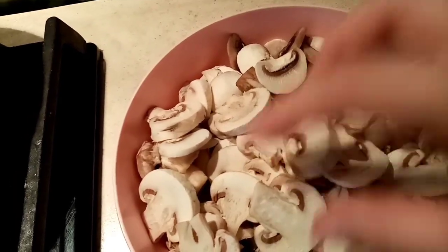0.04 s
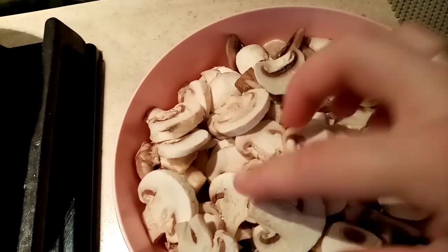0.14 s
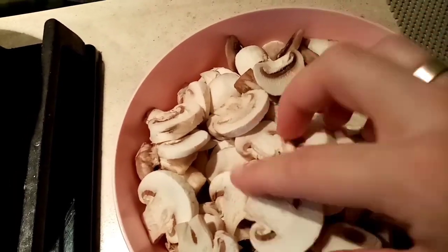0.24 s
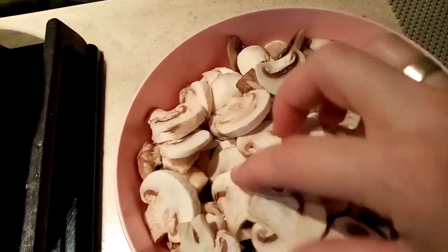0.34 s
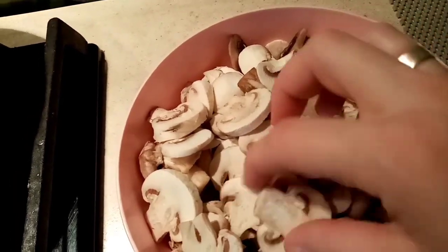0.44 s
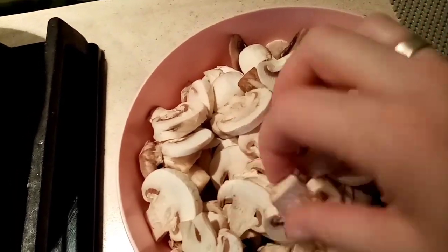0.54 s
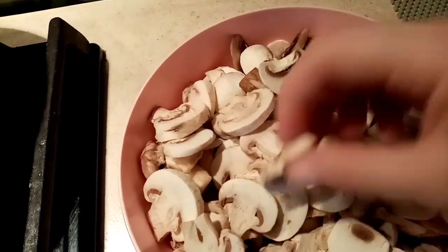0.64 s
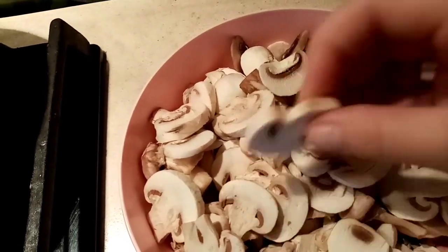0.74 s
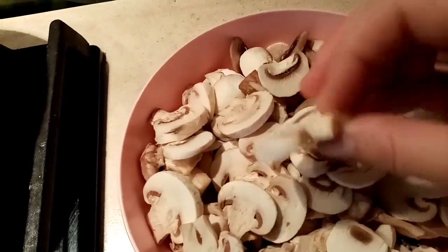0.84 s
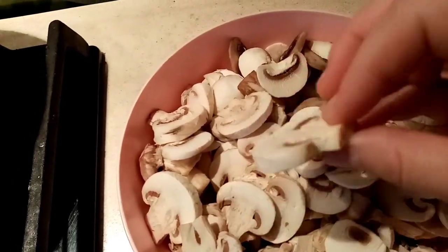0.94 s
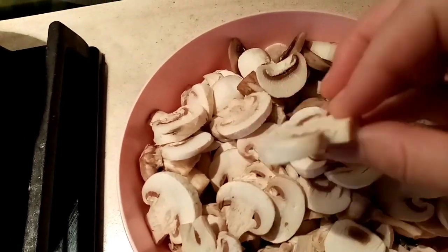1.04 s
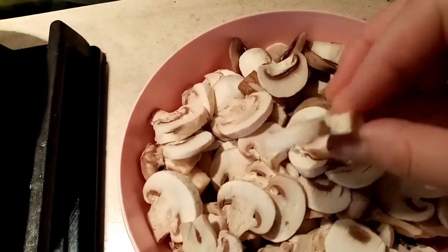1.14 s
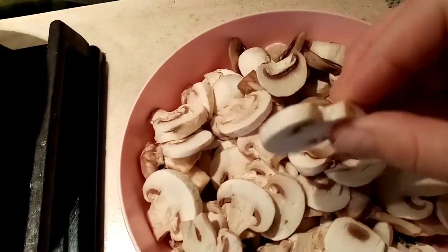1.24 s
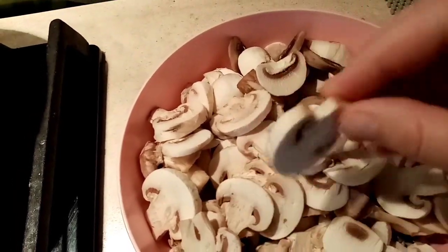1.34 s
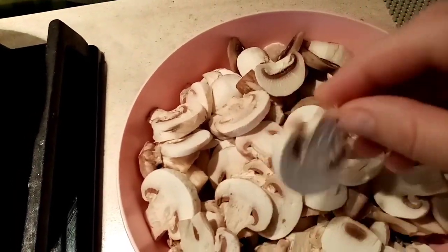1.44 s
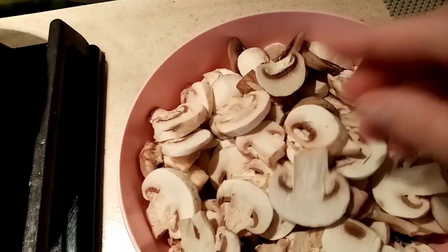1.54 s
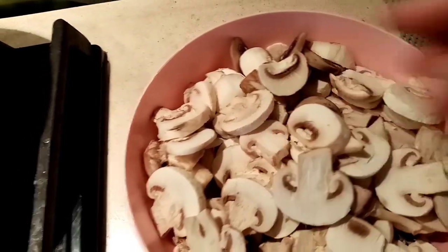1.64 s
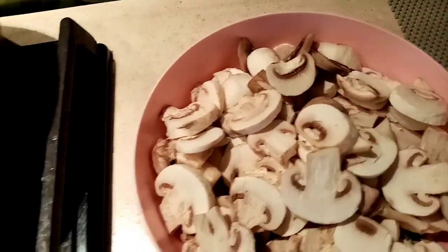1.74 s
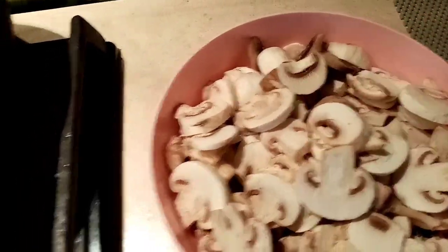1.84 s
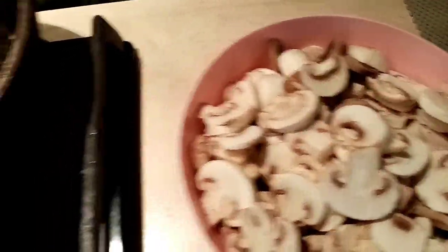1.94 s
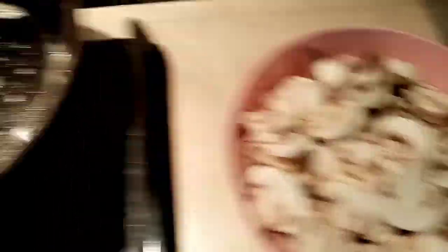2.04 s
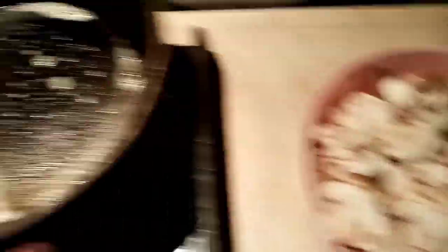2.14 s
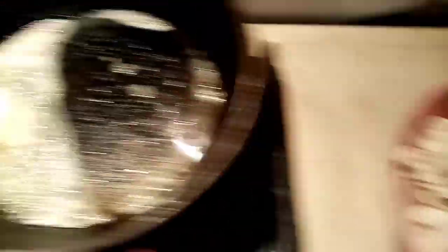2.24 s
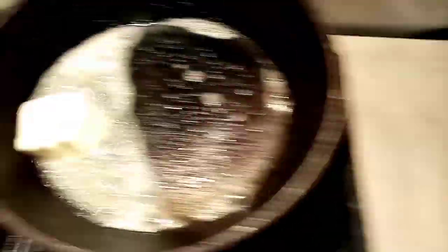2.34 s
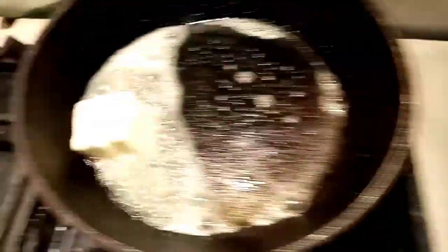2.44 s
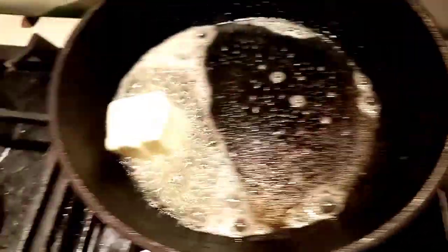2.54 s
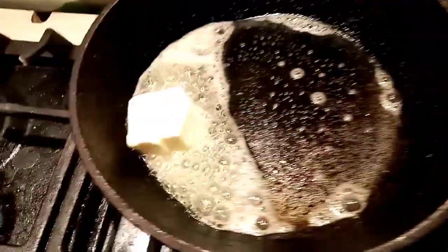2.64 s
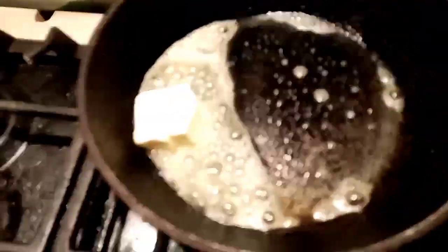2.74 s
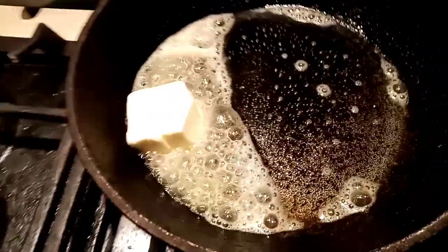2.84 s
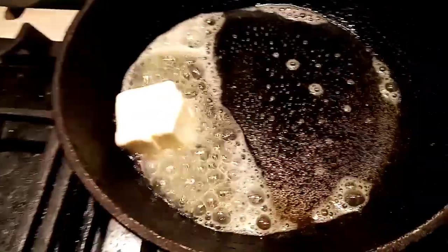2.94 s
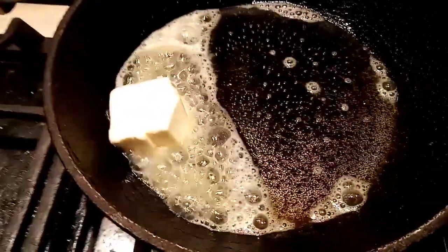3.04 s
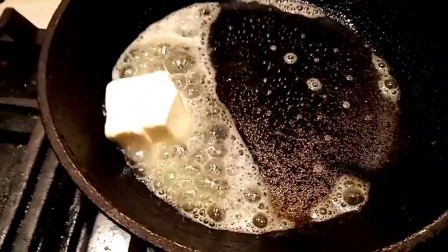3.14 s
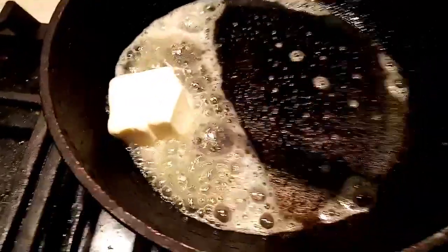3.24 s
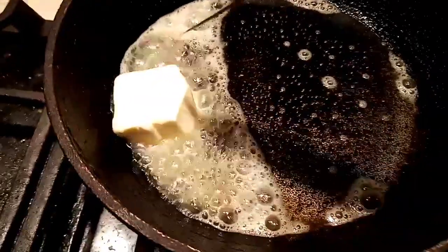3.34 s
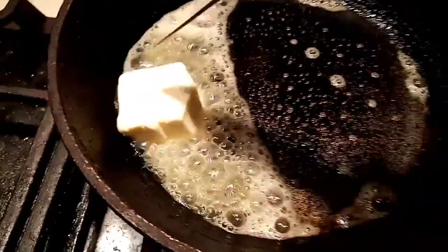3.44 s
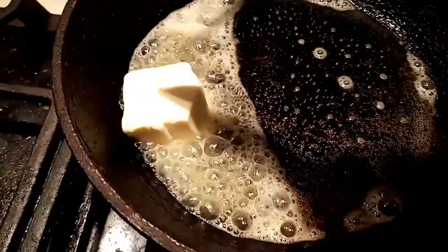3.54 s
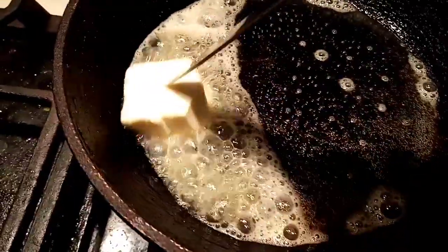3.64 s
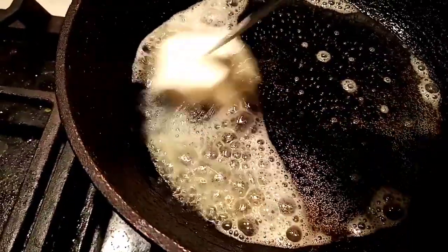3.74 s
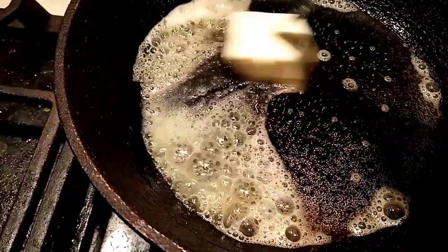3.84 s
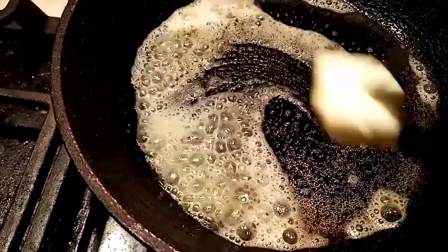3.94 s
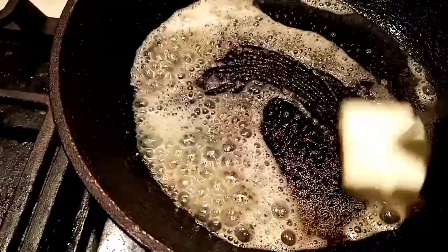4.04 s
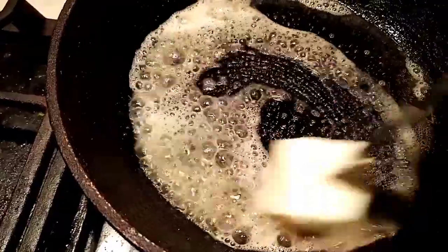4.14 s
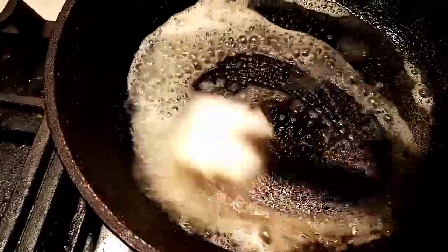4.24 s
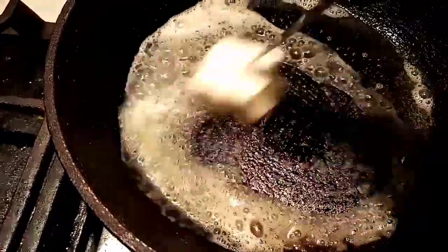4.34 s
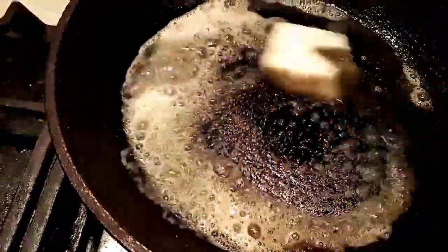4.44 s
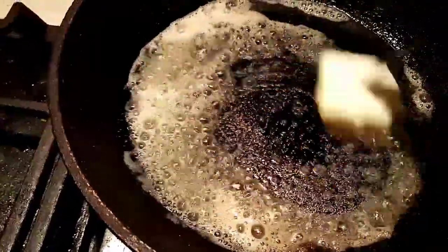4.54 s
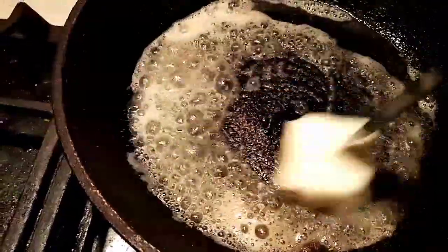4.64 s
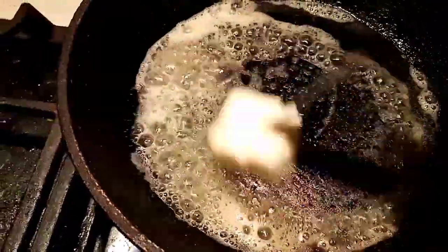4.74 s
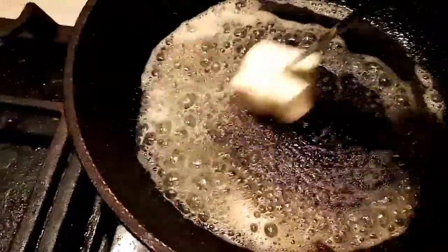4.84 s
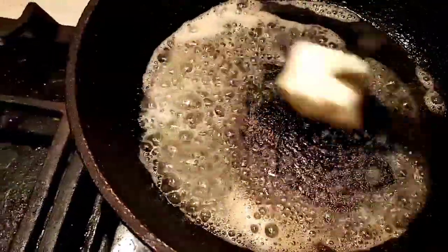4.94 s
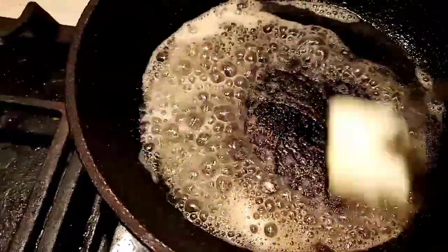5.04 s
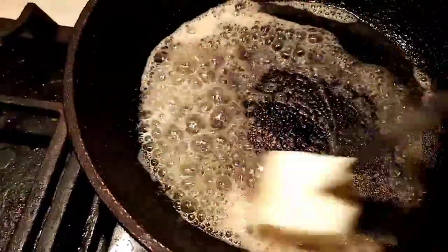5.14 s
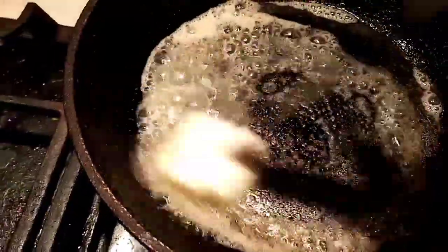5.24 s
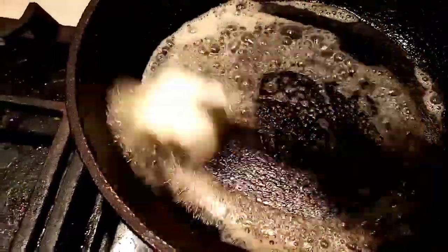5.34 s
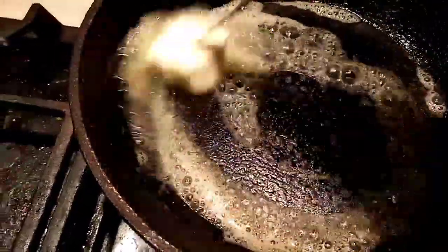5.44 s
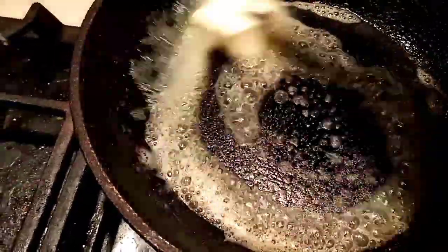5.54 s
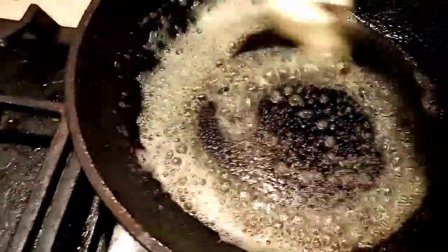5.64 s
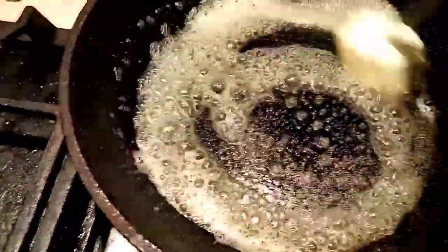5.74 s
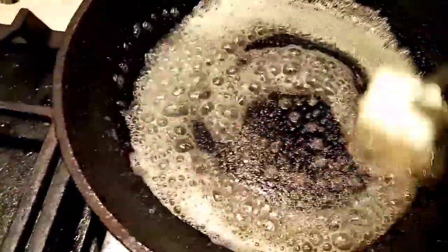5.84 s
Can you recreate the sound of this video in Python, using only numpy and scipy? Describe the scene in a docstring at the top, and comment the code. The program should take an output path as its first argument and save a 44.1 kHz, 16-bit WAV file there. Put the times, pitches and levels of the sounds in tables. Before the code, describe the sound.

Close frying sizzle of melting butter in a home kitchen, growing brighter and spitting more as a utensil pushes it about.

```python
"""Butter frying in a pan

Butter fries in a hot pan on a kitchen hob, heard from a phone that swings over from a bowl of mushrooms.
Thousands of short pings, one for each steam bubble, echo off the pan wall; spreading the butter from about 3.7
s makes the sizzle louder and finer. Larger bubbles spit, sputter and plop above the foam. Filtered pulses and
noise give knocks of the pan and low shoves; damped modes give the utensil's clinks. Early on, a hand taps in
the bowl and mushroom slices tick and thump; later the phone rustles in the hand; the room rumbles."""
import sys
import numpy as np
from scipy import signal
from scipy.fft import rfft, irfft
from scipy.io import wavfile
from scipy.ndimage import uniform_filter1d

SR = 44100
rng = np.random.default_rng(int(sys.argv[2]) if len(sys.argv) > 2 else 0)


def transcribe(signal):
    """Save signal, clipped to [-1, 1], as a 16-bit WAV file at the path in sys.argv[1]."""
    frames = np.atleast_2d(signal).T
    limited = np.clip(frames, -1, 1)
    pcm = np.round(limited * 32767).astype(np.int16)
    wavfile.write(sys.argv[1], SR, pcm)


N = 260190
T = np.arange(N) / SR  # time in s

# Spectrum of the kitchen rumble. Each row: frequency in Hz, relative density in dB per Hz.
KITCHEN = [(20, -16), (45, -20), (70, -15), (95, -3.5), (115, -6.5), (134, 3), (165, -8.5), (210, -12.5),
           (300, -13), (450, -18), (700, -15.5), (1500, -65.5)]
# Touches in the bowl of mushrooms: first a hand taps, then slices brush and land on the heap. Each row: # start
# in seconds, thump level in dB, tick level in dB before its envelope, tick centre in Hz, # tick decay time in
# seconds.
SLICES = [(0.4174, -48.5, -45, 800, 0.003), (1.462, -79, -38.5, 3900, 0.015),
          (1.474, -67, -46, 1420, 0.012)]
# Fingers shift on the phone. Each row: time of the top in seconds, relative level in dB, half width in seconds.
RUBS = [(2.467, -59.5, 0.03), (2.579, -56, 0.033), (2.675, -66.5, 0.025)]
# Resonances of the phone's case. Each row: frequency in Hz, width in Hz, relative level in dB.
CASE = [(142, 33, 6.5), (248, 43, 5), (406, 57, 1), (616, 49, 1), (794, 160, -17), (1090, 43, 1.5)]
# Modes of the hob under the pan. Each row: frequency in Hz, width in Hz, relative level in dB.
HOB = [(90, 20, -8.5), (134.5, 16, 6.5), (199, 160, -8), (242, 12.6, -1.5), (317, 12.4, 1.5),
       (347, 20, -6.5)]
# Slow, low rumbling shoves: in the first two rows the hand moves the bowl of mushrooms, later the butter is
# pushed around. Each row: time of the top in seconds, relative level in dB, centre of the push in Hz,
# half width in seconds.
SHOVES = [(1.43, -73, 115, 0.056), (1.65, -69, 115, 0.058), (3.63, -66, 68, 0.059),
          (4.1, -63.5, 170, 0.053), (5.42, -65.5, 171, 0.071), (5.6, -61, 248, 0.074), (5.7, -57, 90, 0.04),
          (5.79, -60, 190, 0.075)]
# The pan knocks and rocks on the hob. Each row: start in seconds, relative level in dB, contact time in seconds.
KNOCKS = [(5.073, -54, 0.0023), (5.084, -43.5, 0.004), (5.099, -44.5, 0.0046), (5.105, -46, 0.0053),
          (5.157, -53, 0.005), (5.289, -50.5, 0.0036), (5.304, -53, 0.0047), (5.344, -54, 0.003),
          (5.655, -55, 0.0025), (5.683, -55, 0.0091), (5.779, -56, 0.004)]
# The utensil touches the pan. Each row: start in seconds, peak of the direct sound in dB.
TAPS = [(4.191, -39), (5.374, -34), (5.39, -34), (5.3932, -28), (5.397, -25)]
# Modes of the pan. Each row: frequency in Hz, relative level in dB, time to decay by 60 dB in seconds.
PAN_MODES = [(1050, -5, 0.04), (1230, 1, 0.025), (1530, 2, 0.074), (1775, 11, 0.026), (1970, -3.5, 0.1),
             (2360, -2, 0.014), (2470, 3, 0.026)]
# Fat bubbles open in the deep butter. Each row: start in seconds, relative level in dB, pitch in Hz.
PLOPS = [(3.159, -46, 1060), (3.218, -53, 1370), (3.437, -47, 1510), (3.707, -45, 1500), (4.126, -51, 1010),
         (4.209, -45, 1450), (4.257, -41, 1320), (4.577, -44, 1360), (4.733, -44, 1360), (4.879, -44, 1110),
         (5.042, -51, 1080), (5.069, -51, 1020), (5.198, -43, 1260), (5.522, -53, 1040)]
# Clumps of foam collapse. Each row: start in seconds, relative level at the first bubble in dB,
# middle pitch in Hz, length in seconds, left minus right in dB.
SPUTTERS = [(1.631, -37, 4400, 0.045, -4), (1.915, -30.5, 6130, 0.016, -4), (2.09, -29.5, 5200, 0.011, 0),
            (2.151, -33.5, 4300, 0.015, 0), (2.357, -32.5, 5860, 0.008, -6),
            (2.381, -32.5, 5800, 0.016, -9), (2.702, -28.5, 7300, 0.045, -6), (4.202, -27, 7450, 0.06, -12),
            (4.629, -21.5, 6900, 0.042, -2), (4.732, -27.5, 4960, 0.046, 3),
            (4.811, -21.5, 6200, 0.013, -2), (4.88, -23.5, 7850, 0.0086, -12)]
# Loud spits of fat. Each row: start in seconds, relative level in dB, pitch in Hz, left minus right in dB,
# cycles to reach the peak.
SPITS = [(0.307, -29, 4230, -2, 0.89), (0.906, -32, 7260, 3, 2.8), (1.139, -25, 6560, -3, 0.79),
         (1.306, -29, 7750, -10, 1.8), (1.623, -22, 4300, -1.5, 2.4), (1.74, -33, 4900, 1, 1.9),
         (1.9097, -22.5, 6300, -2, 1.3), (2.0906, -22.5, 5800, -2, 0.87), (2.1485, -30.5, 4170, 0, 1.5),
         (2.356, -24, 5600, 0, 2.2), (2.5067, -22, 7030, 2, 2), (2.551, -26, 6500, -9, 1.3),
         (2.6367, -13.5, 5200, -4.5, 0.91), (2.648, -29, 6660, -4, 2.2), (2.681, -20.5, 5460, 0, 0.8),
         (2.7036, -23, 7060, -12, 2.2), (2.7277, -23, 7000, -6, 1.1), (2.736, -25, 6670, -7, 2.2),
         (2.7557, -24, 7000, -4, 2.6), (2.9382, -26, 7040, -9, 1.6), (3.057, -17, 5640, -1, 0.95),
         (3.0956, -19, 6760, -6, 0.84), (3.183, -24, 8200, -3, 2), (3.1914, -22, 6200, -1, 1.1),
         (3.217, -23, 6600, -2, 1), (3.234, -25, 6200, -4, 1.4), (3.239, -24, 6340, -9, 1.6),
         (3.437, -32, 6900, -2, 1.7), (3.494, -20.5, 5100, -2, 1.1), (3.5146, -22, 6700, -2, 2.5),
         (3.55, -24, 5170, 0, 0.95), (3.636, -30, 15000, -6, 4), (3.7726, -18.5, 5700, -1, 0.8),
         (3.7975, -23, 3800, -2, 1.7), (3.877, -23, 5570, 0, 1.4), (3.918, -24.5, 6650, -1, 2.4),
         (3.9398, -24, 5860, 5, 2.1), (3.983, -20.5, 5900, -3, 1.8), (3.9986, -18.5, 7400, -3, 1.8),
         (4.1267, -18.5, 6360, -1, 2.4), (4.168, -22, 6500, -2, 2), (4.19, -23, 4120, -5, 2.8),
         (4.216, -14, 6500, -2, 1.04), (4.268, -14.5, 6900, -2, 0.96), (4.2857, -18.5, 6040, -1, 1.9),
         (4.342, -24, 4600, -2, 0.68), (4.556, -20, 6700, -1, 1.7), (4.652, -15, 6700, -4, 0.62),
         (4.685, -27, 5800, -1, 1.5), (4.731, -19.5, 5400, 0, 2.4), (4.7494, -20, 6650, -5, 1.4),
         (4.81, -20, 6100, -1, 1.4), (4.888, -17, 9000, -5, 2), (4.9364, -17, 6710, 1, 1.1),
         (4.948, -19, 7050, -5, 1.8), (4.987, -21, 6540, -2, 2.4), (5.232, -21, 6700, -8, 1.8),
         (5.239, -18, 6730, -2.5, 1.9), (5.272, -21, 7200, -12, 1.4), (5.288, -22, 6400, -11, 1.8),
         (5.479, -22, 7000, -9, 1.5), (5.519, -24, 7100, -13, 2.6), (5.622, -18, 15000, -6, 4),
         (5.635, -22, 15000, -6, 3.7), (5.715, -27, 15000, -2, 4.6), (5.8, -22.5, 7240, -10, 1.2)]
# Colour of the droplets' snaps. Each row: frequency in Hz, gain in dB.
SNAP = [(3000, -13), (8000, 10), (11000, -12.5), (13500, -13), (14800, 3)]
# Colour of the sizzle. Each row: frequency in Hz, relative density in dB per Hz.
SIZZLE = [(500, -41), (800, -25), (1250, -14.5), (1800, -11), (2150, -13), (3300, -1.9), (5000, 0.5),
          (6600, 3), (7700, 0.5), (8900, 0), (10500, -10), (13500, -16.5), (14700, -5), (15400, -5.5)]
# Hollow resonances of the pan that colour the bubbling. Each row: frequency in Hz, width in Hz, level in dB.
HOLLOW = [(748, 42, 6.5), (1031, 26, -1), (1525, 13, -7.5), (1806, 81, 1.5), (1980, 38, 1.5),
          (2478, 37, -6.5), (6510, 930, -10)]
# How four voices of the frying grow. Each holds: relative level at the start in dB, rise in dB per second as
# more butter melts, rise in dB from above the pan, rise in dB once the butter is spread.
COARSE = (-58.5, 0.5, 0.45, 0.5)
CRACKLE = (-47, 0.7, 3.5, 1.2)
FIZZ = (-56, 1, 1, 10)
GURGLE = (-62, 0.5, 1, 5.5)
# The phone moves over the pan; later, stirring spreads the butter. Each holds: start and length in seconds.
APPROACH = (2.434, 0.15)
SPREAD = (3.71, 0.56)
# Sweeps of the butter over hot metal swell the sizzle. Each row: time of the top in seconds, rise in dB.
SWEEPS = [(4.24, 4.5), (4.66, 3.5), (4.93, 4), (5.23, 4.5), (5.66, 3)]
# Bearing of the pan as the phone turns. Each row: time in seconds, left minus right in dB.
BEARING = [(0.0, 0), (2.48, -0.5), (2.7, -2.5), (3.43, -1.5), (4.96, -3.5), (5.14, -1.5), (5.47, -4.5),
           (5.9, -1)]
# Response of the left microphone port, shaded in the top treble. Each row: frequency in Hz, gain in dB.
LEFT_PORT = [(500, -2.0), (1000, -3.4), (1700, -2.1), (2400, 0.9), (4000, 0.6), (5500, 1.2), (7000, -0.6),
             (8500, -1.6), (9700, -0.7), (10400, -2.7), (11200, -9.9), (13000, -13.6), (14000, -19.0),
             (15400, -23.8)]

TOP_HZ = 15700  # upper limit of the microphones
SWING_S = 2.3  # the arrival lags of the foam change here
ASIDE_LAG_S, PORT_LAG_S = .00135, .0012  # lag of the right port, from the counter and from above


def undb(db):
    """Logarithmic levels: convert decibels to an amplitude gain."""
    return 10 ** (np.asarray(db) / 20)


def unit(x):
    """Normalisation: scale to rms 1."""
    return x / np.sqrt(np.mean(x ** 2))


def convolve(x, response):
    """Linear superposition: pass a sound through an impulse response."""
    return signal.fftconvolve(np.atleast_2d(x), np.atleast_2d(response), axes=-1)[:, :N]


def colour(x, points, size=1024):
    """Minimum phase: a folded cepstrum gives a causal filter through (Hz, dB) points."""
    hz, db = np.transpose(points)
    grid = np.maximum(np.arange(size // 2 + 1) * SR / size, 1)
    target_db = np.interp(np.log(grid), np.log(hz), db)
    cepstrum = irfft(np.log(undb(target_db)))
    cepstrum[1:size // 2] *= 2
    cepstrum[size // 2 + 1:] = 0
    return convolve(x, irfft(np.exp(rfft(cepstrum))))


def band(x, hz, kind, order=4):
    """Maximally flat passband: a Butterworth filter."""
    return signal.sosfilt(signal.butter(order, hz, kind, fs=SR, output="sos"), x)


def split(x, hz, order=5):
    """Complementary filters: the parts below and above a soft border add up to the whole."""
    ratio = np.arange(N // 2 + 1) * SR / N / hz
    low = irfft(rfft(x) / (1 + ratio ** (2 * order)), N)
    return low, x - low


def resonate(x, modes):
    """Modal superposition: sum (Hz, width Hz, dB) resonances, each a narrow bandpass."""
    return sum(undb(db) * band(x, [hz - width / 2, hz + width / 2], "band", order=1) for hz, width, db in modes)


def walk(rate):
    """Slow random fluctuation: levels drawn at a rate in Hz, smoothly joined, rms 1."""
    hold = int(SR / rate)
    steps = np.repeat(rng.standard_normal(N // hold + 1), hold)[:N]
    return unit(uniform_filter1d(steps, hold))


def ramp(start, length):
    """Raised-cosine transition: a smooth move from 0 to 1."""
    return (1 - np.cos(np.pi * np.clip((T - start) / length, 0, 1))) / 2


def growth(start_db, melt_db_per_s, near_db, spread_db):
    """Source level, in dB, of one frying voice: sum the gains of melting, approach and spreading."""
    return start_db + melt_db_per_s * T + near_db * ramp(*APPROACH) + spread_db * ramp(*SPREAD)


def low_noise():
    """Spatial coherence: noise whose long waves are more alike at the two ports."""
    mid, side = rng.standard_normal((2, N))
    long_waves, short_waves = split(side, 200)
    side = undb(-9) * long_waves + short_waves
    return np.array([mid + side, mid - side])


def surroundings(wall_db, room_db, wall_s=0.006, room_t60=0.18, size=12000):
    """Reverberation at one spot: direct sound, quick echoes off the pan wall, then the kitchen."""
    t = np.arange(size) / SR
    wall = rng.standard_normal((2, size)) * np.exp(-t / wall_s) * (t > .0005)
    room = rng.standard_normal((2, size)) * undb(-60 * t / room_t60) * (t > .004)
    response = (undb(wall_db) * unit(wall) + undb(room_db) * unit(room)) / np.sqrt(size)
    response[:, 0] = 1
    return response


def bursts(when, gain, hz, rise_s, pan_db, lag_s, size=112):
    """Transient radiation: each bursting bubble is a brief ping that reaches the left port first."""
    out = np.zeros((2, N))
    phase = rng.uniform(0, 2 * np.pi, (len(when), 1))
    for ear, (start, side_db) in enumerate([(when, pan_db / 2), (when + lag_s, -pan_db / 2)]):
        index = np.ceil(start * SR).astype(int)[:, None] + np.arange(size)
        age = index / SR - start[:, None]  # exact to a fraction of a sample
        swell = age / rise_s[:, None]
        envelope = (swell * np.exp(1 - swell)) ** 2  # peaks at 1 when age equals rise_s
        ping = envelope * np.sin(2 * np.pi * hz[:, None] * age + phase)
        weighted = ping * (gain * undb(side_db))[:, None]
        out[ear] = np.bincount(index.ravel(), weighted.ravel(), N)[:N]
    return out


def kitchen(level_db=-73, waver_db=2.5, right_db=1, near_db=4):
    """Ambient noise: a faint, wavering low rumble, a little stronger over the hob."""
    db = level_db + near_db * ramp(*APPROACH) + waver_db * walk(23)
    return unit(colour(low_noise(), KITCHEN, size=8192)) * undb(db) * undb([[-right_db], [0]])


def mushrooms(thump_hz=320, thump_s=0.0019, settle_db=-15, settle_s=0.055, settle_rise_s=0.0074,
              tick_rise_s=0.0005):
    """Soft impact: a touch in the bowl gives a tick and a heavily damped thump, then the heap settles."""
    out, t = np.zeros((2, N)), T[:SR // 4]
    for when, thump_db, tick_db, tick_hz, tick_s in SLICES:
        heap, skin = rng.standard_normal((2, 2, len(t)))
        thump = np.sin(2 * np.pi * thump_hz * t) * (t / thump_s * np.exp(1 - t / thump_s)) ** 2
        settle = 2 * unit(band(heap, [140, 480], "band", order=2))
        settle *= np.exp(-t / settle_s) * (1 - np.exp(-t / settle_rise_s))
        tick = unit(band(skin, [tick_hz / 1.2, tick_hz * 1.47], "band", order=2))
        tick *= np.exp(-t / tick_s) * (1 - np.exp(-t / tick_rise_s))
        landing = undb(thump_db) * (thump + undb(settle_db) * settle) + undb(tick_db) * tick
        start = int(when * SR)
        out[:, start:start + len(t)] += landing
    return out


def handling(slip_rate=500, gain_db=2):
    """Stick-slip friction: tiny uneven slips of skin, slip_rate per second, excite the phone's case."""
    slips = low_noise() * (rng.uniform(size=N) < slip_rate / SR)
    grip = sum(undb(db + gain_db) * np.exp(-((T - when) / width) ** 2 / 2) for when, db, width in RUBS)
    return unit(resonate(slips, CASE)) * grip


def shoves(gain_db=3, right_db=2, judder_db=3):
    """Forced vibration: juddering noise that swells and ebbs drives low modes, for bowl and butter alike."""
    shake, out = low_noise() * undb(judder_db * walk(120)), np.zeros((2, N))
    for when, db, hz, width in SHOVES:
        near = np.abs(T - when) < 4 * width
        push = band(shake[:, near], [hz / 1.6, hz * 1.6], "band", order=2)
        rumble = unit(band(resonate(push, HOB), 344, "low"))
        out[:, near] += undb(db + gain_db) * rumble * np.exp(-((T[near] - when) / width) ** 2 / 2)
    return out * undb([[0], [right_db]])


def knocks(gain_db=2.7, left_db=-0.5, right_db=2.5):
    """Impulse excitation: one short push rings the hob's modes; briefer contact reaches higher ones."""
    out, t = np.zeros(N), T[:SR // 2]
    for when, db, contact in KNOCKS:
        push = np.sin(np.pi * np.minimum(t / contact, 1)) ** 2
        thud = band(resonate(push, HOB), 410, "low")
        start = int(when * SR)
        out[start:start + len(t)] += undb(db + gain_db) * thud[:N - start] / np.abs(thud).max()
    heard = convolve(band(out, 75, "high", order=2), surroundings(wall_db=-14, room_db=-11))
    return heard * undb([[left_db], [right_db]])


def clinks(scrape_db=7, scrape_s=0.0028):
    """Damped modes: the utensil's touch is a short, dry scrape; fat and grate damp the pan's ring."""
    out, t = np.zeros(N), T[:SR // 2]
    ring = sum(undb(db - 60 * t / t60) * np.sin(2 * np.pi * hz * t) for hz, db, t60 in PAN_MODES)
    for when, db in TAPS:
        noise = rng.standard_normal(len(t))
        scrape = unit(band(noise, [1200, 2700], "band", order=2)) * np.exp(-t / scrape_s)
        touch = band(ring + undb(scrape_db) * scrape, 1320, "high", order=3)  # a small pan radiates little bass
        start = int(when * SR)
        out[start:start + len(t)] += undb(db) * touch[:N - start] / np.abs(touch).max()
    return convolve(out, surroundings(wall_db=-10, room_db=-13))


def plops(cycles=1.64):
    """Bubble resonance: fat bubbles ring briefly and low, peaking after a fixed count of cycles."""
    when, db, hz = np.transpose(PLOPS)
    pings = bursts(when, undb(db), hz, cycles / hz, np.zeros(len(when)), PORT_LAG_S, size=400)
    return convolve(pings, surroundings(wall_db=-5, room_db=-8))


def sputters(pitch_scatter=0.12, size_scatter_db=3, rise_s=0.00024, count=12):
    """Cascade: a collapsing clump of foam is a quick run of similar bubbles, weakening on the whole."""
    order, parts = np.arange(count) / count, []
    for when, db, hz, length, pan_db in SPUTTERS:
        pitch, size, side = rng.standard_normal((3, count))
        times = when + length * (order + rng.uniform(size=count) / count)
        gain = undb(db + size_scatter_db * size) * np.exp(-order)
        pitches = hz * np.exp(pitch_scatter * pitch)
        parts.append([times, gain, pitches, np.full(count, rise_s), pan_db + 2 * side])
    return convolve(bursts(*np.hstack(parts), PORT_LAG_S), surroundings(wall_db=-6, room_db=-9))


def spits(gain_db=2.3, plop_db=-20, plop_hz=2300, plop_s=0.00017):
    """Point sources: large bubbles crack out, each from its own spot and with a faint lower plop."""
    out = np.zeros((2, N))
    for when, db, hz, pan_db, cycles in SPITS:
        crack = (0, undb(db), hz, cycles / hz, pan_db, PORT_LAG_S)
        plop = (0, undb(db + plop_db), plop_hz, plop_s, pan_db, PORT_LAG_S)
        ping = bursts(*np.transpose([crack, plop]))[:, :256]
        sound = convolve(ping, surroundings(wall_db=-5, room_db=-9.5))
        start = int(when * SR)
        out[:, start:start + sound.shape[1]] += sound[:, :N - start]
    return undb(gain_db) * band(out, 1800, "high", order=2)  # bubbles are too small to radiate bass


def stray_bubbles(rate, centre_hz, pitch_spread, rise_s, spread_db, level_db):
    """Random point process: lone bubbles of uneven pitch and strength follow a level curve."""
    when, size, pitch, length, side = rng.uniform(size=(int(rate * N / SR), 5)).T
    index = (when * (N - 1)).astype(int)
    hz = np.minimum(centre_hz * np.exp(pitch_spread * (2 * pitch - 1)), TOP_HZ)
    db = level_db[index] - spread_db * np.sqrt(size)
    pan_db = np.interp(T[index], *np.transpose(BEARING)) + 4 * (2 * side - 1)
    pings = bursts(T[index], undb(db), hz, rise_s * (.5 + length), pan_db, PORT_LAG_S, size=300)
    return convolve(pings, surroundings(wall_db=-7, room_db=-10))


def crackles(pop_db=13, blip_db=7, snap_db=25):
    """Size and pitch: middling bubbles pop, larger ones blip low, droplets snap high on bare metal."""
    # bubbles per second, centre Hz, pitch spread, rise s, strength spread dB, level curve
    pops = stray_bubbles(260, 6400, .42, .00042, 14, growth(*CRACKLE) + pop_db)
    blips = stray_bubbles(45, 1000, .35, .0012, 12, growth(*GURGLE) + blip_db)
    snaps = stray_bubbles(90, 13500, .2, .00012, 20, growth(*FIZZ) + snap_db)
    return pops + blips + colour(snaps, SNAP)


def foam_patch(rate=1350, spread_db=3.0, largest_db=15, rise_s=0.00017, scatter_db=2.5):
    """Shot noise: one patch of foam bursts rate times a second, mostly weakly, with quick flickers of level."""
    when = rng.uniform(0, N / SR, int(rate * N / SR))
    length, side, place = rng.standard_normal((len(when), 3)).T
    size_db = np.minimum(spread_db * rng.exponential(size=len(when)), largest_db)
    size_db = size_db + 1.5 * walk(50)[(when * SR).astype(int)]
    hz = rng.uniform(0, TOP_HZ + 1000, len(when))
    # seen from the counter the pan is off to the left; from above, its spots spread over a wider angle
    aside_lag_s = ASIDE_LAG_S * (1 + 0.037 * place)
    above_lag_s = PORT_LAG_S * (1 + 0.1207 * place)
    lag_s = np.abs(np.where(when < SWING_S, aside_lag_s, above_lag_s))
    stretch = np.exp(0.85 * length)
    gain = undb(size_db) / np.sqrt(stretch)  # slow bursts are the weaker ones
    pings = bursts(when, gain, hz, rise_s * stretch, scatter_db * side, lag_s, size=64)
    return convolve(pings, surroundings(wall_db=-3, room_db=-3.5))


def sizzle(count=4, coarse_hz=2800, fine_hz=10500, gurgle_hz=1350, gurgle_aside_db=-3, gurgle_above_db=4.5,
           sweep_s=0.16, lull_db=0.99):
    """Incoherent sum of foam patches, in three bands; spreading the butter raises the highest most."""
    foam = colour(sum(foam_patch() for _ in range(count)), SIZZLE)
    foam = band(foam, 642, "high", order=5)
    coarse, rest = split(foam + resonate(foam, HOLLOW), coarse_hz)
    crackle, fizz = split(rest, fine_hz, order=10)
    # big, low bubbles are heard best from above the pan
    gurgle, bubbling = split(unit(coarse), gurgle_hz)
    gurgle_db = gurgle_aside_db + (gurgle_above_db - gurgle_aside_db) * ramp(*APPROACH)
    coarse = bubbling + gurgle * undb(gurgle_db)
    swell_db = sum(db * np.exp(-((T - when) / sweep_s) ** 2) for when, db in SWEEPS)
    swell_db = swell_db + lull_db * walk(35)  # quick surges and lulls
    # the crackle swells in full, the coarse bubbling by half the dB, the fizz not at all
    coarse = coarse * undb(growth(*COARSE) + swell_db / 2)
    crackle = unit(crackle) * undb(growth(*CRACKLE) + swell_db)
    fizz = unit(fizz) * undb(growth(*FIZZ))
    left, right = coarse + crackle + fizz
    return np.array([left * undb(np.interp(T, *np.transpose(BEARING))), right])


def scene():
    """Superposition: the room, the bowl, the hand on the phone, shoves, pan noises and the frying."""
    background = kitchen() + mushrooms() + handling() + shoves()
    pan = knocks() + clinks()
    frying = plops() + sputters() + spits() + crackles() + sizzle()
    return background + pan + frying


def record(dry):
    """Transducer response: the phone has a duller left port and a steep cut at the top."""
    ports = np.array([colour(dry[0], LEFT_PORT)[0], dry[1]])
    return signal.sosfilt(signal.ellip(10, .2, 80, TOP_HZ, fs=SR, output="sos"), ports)


dry = scene()
out = record(dry)
transcribe(out)
```